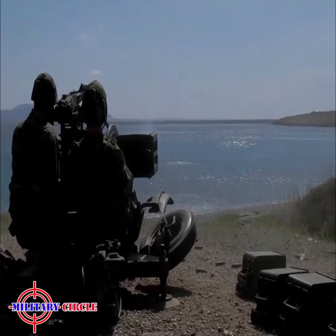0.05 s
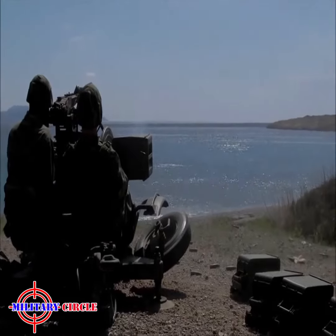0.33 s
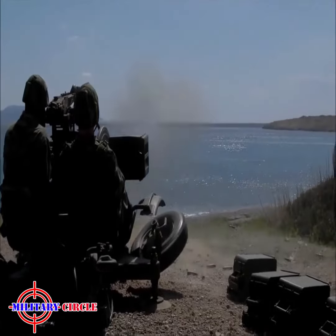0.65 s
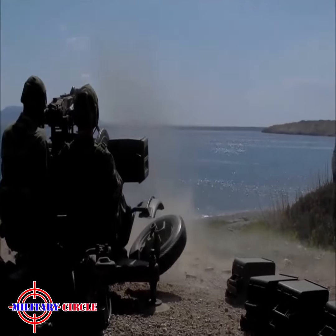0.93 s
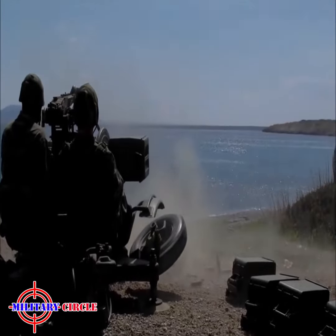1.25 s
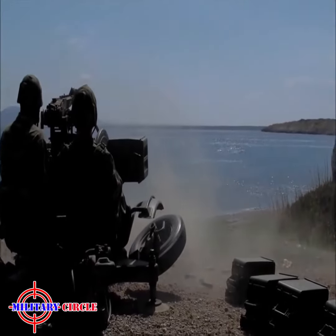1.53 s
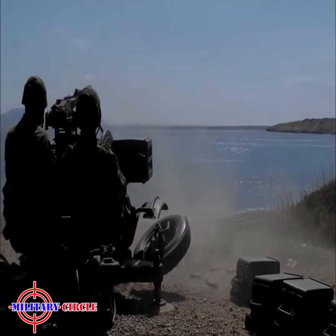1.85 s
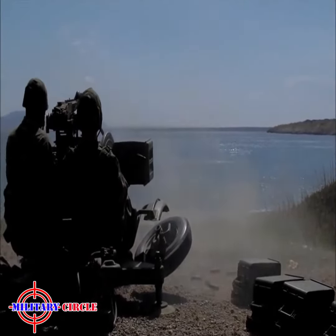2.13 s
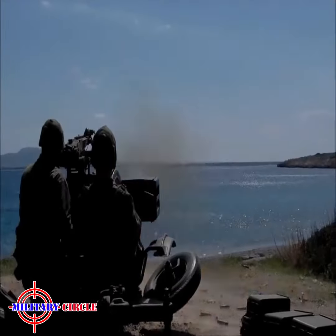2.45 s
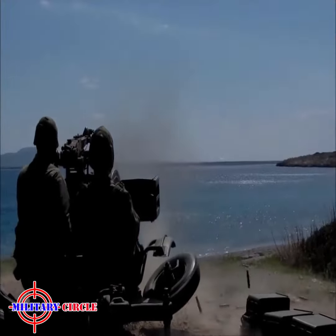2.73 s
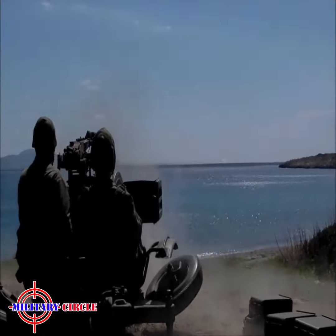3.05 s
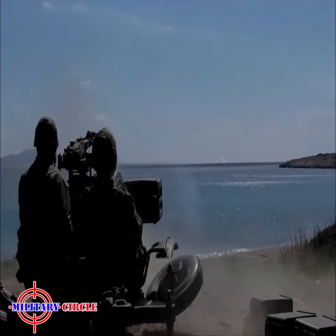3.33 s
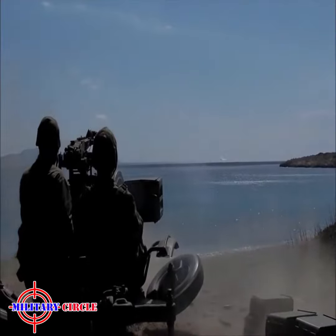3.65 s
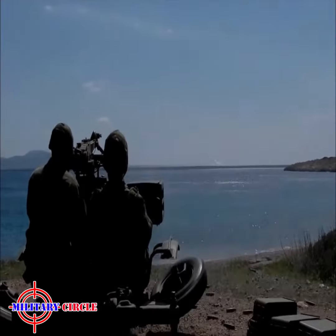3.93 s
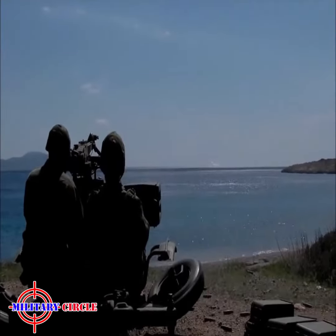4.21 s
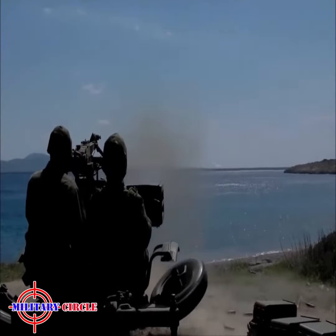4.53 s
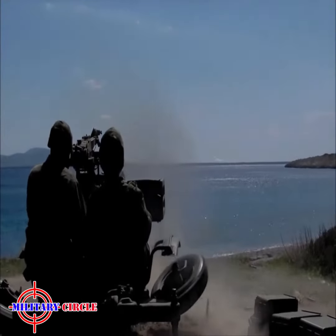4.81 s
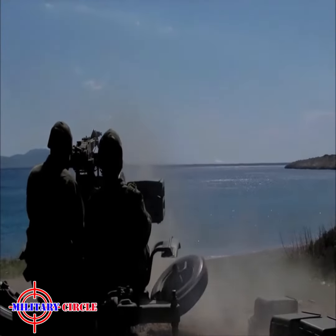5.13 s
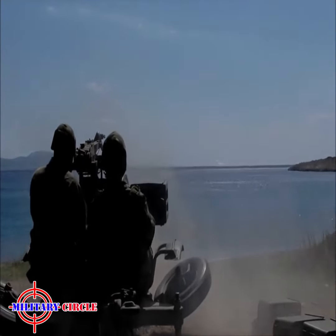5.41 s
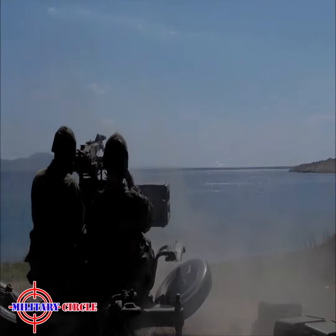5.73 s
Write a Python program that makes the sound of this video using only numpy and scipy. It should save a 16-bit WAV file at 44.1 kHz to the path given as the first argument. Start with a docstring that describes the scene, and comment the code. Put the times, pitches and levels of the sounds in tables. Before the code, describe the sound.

Wind buffets the microphone as a nearby anti-aircraft gun fires three rapid bursts, each trailed by rumbling echoes and clinking shell cases.

```python
"""Gusts on a shore buffet the microphone, mostly its right port, among a few dry ticks.
At 0.5 s a twin-barrel anti-aircraft cannon a few metres away fires five rounds. Each blast overloads
the limiter, so its boom only comes through between rounds. The land rolls the burst back, ever deeper,
while spent cases and links spill on the stones. Louder bursts follow at 2.4 s and 4.3 s, each trailed
by jingling brass; a low rumble lingers under the wind to the end."""
import sys
import numpy as np
from scipy import signal
from scipy.fft import rfft, irfft
from scipy.io import wavfile

SR = 44100
rng = np.random.default_rng(int(sys.argv[2]) if len(sys.argv) > 2 else 0)


def to_wav(s):
    """Save 16-bit WAV."""
    ch = np.atleast_2d(s).T  # columns
    pcm = np.round(np.clip(ch, -1, 1) * 32767)  # PCM
    wavfile.write(sys.argv[1], SR, pcm.astype(np.int16))


N = 258867
T = np.arange(N) / SR
HZ = np.maximum(np.fft.rfftfreq(N, 1 / SR), 1)


def undb(db):
    """Decibels to gain."""
    return 10 ** (np.asarray(db) / 20)


def unit(x):
    """Scale to rms 1."""
    return x / np.sqrt(np.mean(x ** 2))


def over_hz(points):
    """Join (Hz, value) points on a log-frequency axis."""
    hz, value = np.transpose(points)
    return np.interp(np.log(HZ), np.log(hz), value)


def resonance(hz, q):
    """Complex band-pass response, 1 at the centre."""
    return 1 / (1 + 1j * q * (HZ / hz - hz / HZ))


def smooth(x, tau_s):
    """One-pole average."""
    pole = np.exp(-1 / (tau_s * SR))
    return signal.lfilter([1 - pole], [1, -pole], x)


def white():
    """Two independent white noises."""
    return rng.standard_normal((2, N))


def drift(rate_hz):
    """Smooth random motion up to about rate_hz; rms 1."""
    return unit(irfft(rfft(rng.standard_normal(N)) / (1 + (HZ / rate_hz) ** 4), N))


def strike(start_s, rise_s, t60_s, hold_s=0):
    """Envelope: linear rise, hold, exponential decay."""
    age = np.maximum(T - start_s, 0)
    return np.minimum(age / rise_s, 1) * np.exp(-np.log(1000) * np.clip((age - hold_s) / t60_s, 0, 2))


def swell(peak_s, sigma_s):
    """Gaussian envelope."""
    return np.exp(-((T - peak_s) / sigma_s) ** 2 / 2)


def power_sum(envelopes):
    """Joint envelope of uncorrelated sounds."""
    return np.sqrt(sum(envelope ** 2 for envelope in envelopes))


def n_wave(start_s, width_s):
    """Rounded push-pull pressure pulse, peak 1."""
    age = np.clip((T - start_s) / width_s - 2, -6, 6)
    return np.sqrt(2 * np.e) * age * np.exp(-age ** 2)


def throb(hz, q, side_gain=0.053):
    """Pressure swings of uneven length and nearly even size, alike on both sides."""
    bins = N // 32
    band = np.fft.ifft(rfft(white())[:, :bins] * resonance(hz, q)[:bins] ** 2)
    swing = np.real(band / (np.abs(band) + np.std(band) / 2))
    mid, side = irfft(rfft(swing), N)
    return unit(np.array([mid + side_gain * side, mid - side_gain * side]))


# left-right likeness of scene sound and of wind on the ports: (frequency [Hz], in-phase weight)
FIELD_LIKENESS = [(60, 0.86), (280, 0.85), (640, -0.19), (1400, -0.36), (3100, -0.64), (15000, -0.41)]
WIND_LIKENESS = [(60, 0.27), (130, 0.31), (300, -0.099), (640, -0.19), (1400, -0.62), (3100, -1.21),
                 (9000, 0.25)]
# lag of the left port: (frequency [Hz], quarter-cycle weight)
PORT_LAG = [(100, 0.033), (280, 0.13), (600, 0.6), (1400, 0.55), (3000, 0.014)]


def stereo(noises, response, likeness=FIELD_LIKENESS):
    """Colour two independent noises, mix them as mid and side and shift the left's phase; rms 1."""
    shared = over_hz(likeness) - 1j * over_hz(PORT_LAG)
    coherence = np.minimum(np.abs(shared), .98)
    mid, side = rfft(noises) * response * np.sqrt([1 + coherence, 1 - coherence])
    left = (mid + side) * np.exp(1j * np.angle(shared))
    return unit(irfft(np.array([left, mid - side]), N))


# level of the wind noise, dropping out abruptly near 2.24 s: (time [s], level [dB])
WIND_LEVEL = [(0, -15.5), (.14, -16), (.39, -15.5), (.9, -17), (1.07, -14.5), (1.22, -18), (1.41, -16.5),
              (1.44, -22.5), (1.51, -18.5), (1.72, -15), (1.9, -23), (2.01, -16), (2.23, -18), (2.25, -28),
              (2.36, -15.5), (2.9, -18), (3.14, -25), (3.35, -20), (3.45, -24), (3.53, -18), (3.68, -18),
              (3.75, -21.5), (3.79, -18), (3.95, -19), (4.06, -16.5), (4.24, -20.5), (4.26, -16),
              (4.8, -18.5), (5.11, -18.5), (5.14, -17.5), (5.33, -15), (5.53, -16.5), (5.62, -14),
              (5.86, -17)]


def wind_db(usual_db=-16.5):
    """Level of the wind noise relative to its usual value."""
    return np.interp(T, *np.transpose(WIND_LEVEL)) - usual_db


# spectra of wind on the ports: (frequency [Hz], level [dB])
BUFFET_SPECTRUM = [(20, -41), (35, -11), (70, -3.5), (150, 0), (380, -1), (600, -9), (900, -13.5),
                   (1500, -36), (4000, -61)]
FLUTTER_SPECTRUM = [(200, -44), (500, 9.5), (850, 6), (1500, 0.5), (2250, -7), (3600, -18.5), (5000, -50),
                    (9000, -42.5), (15000, -75)]


def wind(buffet_db=-16, flutter_db=-21, left_buffet_db=-10.5, left_flutter_db=-6, flutter_slope=2.39):
    """Eddies thump the ports and break up into a quick, spitting flutter."""
    eddies = drift(34)
    sputter_db = 3 * eddies + 2.5 * drift(110)
    thumps = white() * undb(0.96 * eddies + 4.15 * drift(490))
    spits = white() * undb(sputter_db + 3.5 * drift(410))
    buffet = stereo(thumps, undb(over_hz(BUFFET_SPECTRUM)), WIND_LIKENESS)
    flutter = stereo(spits, undb(over_hz(FLUTTER_SPECTRUM)), WIND_LIKENESS)
    buffet *= undb(buffet_db + wind_db()) * undb([[left_buffet_db], [0]])
    flutter *= undb(flutter_db + flutter_slope * wind_db()) * undb([[left_flutter_db], [0]])
    return buffet + flutter


def wind_crackle(db=-27, rate_hz=110, gust_slope=3.4, scatter_db=4, centre_hz=700, left_db=-8):
    """Small eddies burst on the right port as dull pressure spikes, harder in gusts."""
    spikes = (rng.random(N) < rate_hz / SR) * undb(scatter_db * np.clip(rng.standard_normal(N), -2, 2))
    dull = resonance(centre_hz, .4) ** 3 / (1 + (HZ / 1900) ** 5)
    pops = unit(irfft(rfft(spikes) * dull, N))
    return pops * undb(db + gust_slope * wind_db()) * np.array([[-undb(left_db)], [1]])


# hardest eddies: (time [s], level [dB])
SLAPS = [(.294, -13), (0.401, -3), (0.458, -1), (1.083, -11), (1.141, -20), (1.394, -3), (1.732, -14),
         (1.822, -5.5), (2.037, -4), (2.168, -4.5), (2.223, 0), (3.236, -13.5), (3.521, -10), (3.57, -17),
         (3.636, -14), (3.678, -5.5), (3.709, -6.5), (3.787, -6), (3.816, -9), (3.881, -9), (4.029, -13),
         (4.193, -7), (4.259, -1), (5.152, 5), (5.175, -3), (5.224, -16), (5.295, -3), (5.309, -2),
         (5.448, -1), (5.57, -12), (5.607, 0), (5.661, -6), (5.692, 0), (5.838, -6)]


def wind_slaps(pulse_db=-1, flutter_db=-7, thump_db=-13, left_db=-8):
    """A lone eddy hits the right port: pulse, flutter, thump; the left port swings the other way."""
    pulses = sum(undb(db + pulse_db) * n_wave(s, 0.0004) for s, db in SLAPS)
    flutter_env = sum(undb(db + flutter_db) * strike(s, 0.0019, 0.035) for s, db in SLAPS)
    flutter = flutter_env * stereo(white(), resonance(650, .6) ** 3, WIND_LIKENESS)
    thump_env = sum(undb(db + thump_db) * strike(s, 0.005, 0.092) for s, db in SLAPS)
    thump = thump_env * stereo(white(), resonance(340, 1) ** 2, WIND_LIKENESS)
    return (pulses * np.array([[-1], [1]]) + flutter + thump) * undb([[left_db], [0]])


# dry ticks and one sharp click: (time [s], level [dB], left minus right [dB], t60 [s])
TICKS = [(0.024, -20, -4, .019), (.035, -27, 0, 0.016), (0.2944, -19, -4, .022), (0.345, -27, -4, 0.021),
         (0.394, -22.5, -4, 0.042), (0.456, -23, -5, 0.037), (0.479, -21, -1, 0.034),
         (0.9972, -13.5, -5, 0.015), (1.058, -25, -7, 0.05), (1.084, -26, 1, .03),
         (1.1345, -23.5, -7, 0.018), (1.636, -26.5, -3, .019), (1.685, -28, 4, 0.021),
         (2.046, -31, -7, .019), (2.222, -24, -3, 0.019), (3.9648, -18, 9, 0.0053), (4.123, -33, -9, 0.013),
         (5.4485, -29, 4, .019)]
# tick spectrum: (frequency [Hz], level [dB])
TICK_SPECTRUM = [(500, -5), (2000, 12.5), (7000, -8.5), (15000, -17)]


def ticks(rattle_db=-17):
    """Dry ticks and one sharp click, each trailing a fine rattle five times its length."""
    envelope = 0
    for s, db, pan_db, t60_s in TICKS:
        shape = strike(s, 0.0012, t60_s) + undb(rattle_db) * strike(s, 0.01, 5 * t60_s)
        envelope += undb(db + np.array([[pan_db], [-pan_db]]) / 2) * shape
    return envelope * stereo(white(), undb(over_hz(TICK_SPECTRUM)))


# modes of a brass case: (frequency [Hz], level [dB], t60 [s])
BRASS_MODES = [(2050, 1, 0.048), (3090, 4, 0.058), (3500, -6, .05), (4290, 1, 0.14), (5230, -8, .06),
               (6700, -31, 0.091), (9950, -10.5, 0.13), (10400, -15, .11), (11700, -20, .07),
               (13000, -20, .03)]


def case_ring(pitch, tilt_db_per_oct=0, split=.018):
    """One knock on a case; dents split each mode into a cluster of three."""
    t = T[:SR // 4]
    out = 0
    for hz, db, t60_s in BRASS_MODES:
        cluster_hz = hz * pitch * (1 + split * rng.uniform(-1, 1, (3, 1, 1)))
        swing = np.sin(2 * np.pi * (cluster_hz * t + rng.random((3, 2, 1)))).sum(axis=0)
        gain = undb(db + tilt_db_per_oct * np.log2(hz / BRASS_MODES[0][0]))
        out += gain * np.exp(-np.log(1000) * t / t60_s) * swing
    return out


# cases rolling together: (peak time [s], level [dB], sigma [s])
JINGLES = [(3.22, -48.5, .16), (5.15, -44, .17)]


def jingle(knock_rate_hz=22, count=7, detune=.012):
    """Rolling cases knock together and ring at nearly one pitch."""
    rings = 0
    for pitch in 1 + detune * np.linspace(-1, 1, count):
        knocks = (rng.random(N) < knock_rate_hz / SR) * rng.uniform(0.29, 1, (2, N))
        rings += signal.oaconvolve(knocks, case_ring(pitch), axes=1)[:, :N]
    return unit(rings) * sum(undb(db) * swell(s, sigma_s) for s, db, sigma_s in JINGLES)


# spill of brass per burst: (landing time [s], level [dB], fade [dB/s])
SPILLS = [(.88, -32.5, 22), (2.78, -26.5, 36), (4.97, -28, 34)]
# scuffed gravel: (frequency [Hz], level [dB])
GRIT_SPECTRUM = [(1000, 0.5), (3800, 3), (5500, -12), (7500, -48), (9000, -12.5), (10500, -12),
                 (15000, -28)]


def grit(gain_db=-2, stir_db=-46.5, gust_slope=2.9, settle_db_per_s2=8):
    """Cases and links scuff the gravel during each burst, then settle; wind always stirs a little."""
    envelopes = [undb(stir_db + gust_slope * wind_db())]
    for (start_s, *_), (landing_s, db, fade) in zip(BURSTS, SPILLS):
        age = np.maximum(T - landing_s, 0)
        envelopes.append((T > start_s) * undb(db - fade * age - settle_db_per_s2 * age ** 2))
    scuffing = undb(1.8 * drift(45) + 1.2 * drift(600)) * white()
    return undb(gain_db) * power_sum(envelopes) * stereo(scuffing, undb(over_hz(GRIT_SPECTRUM)))


# single cases landing: (time [s], level [dB], pitch [ratio], tilt [dB/octave])
CLINKS = [(1.908, -57, 1, 9), (3.083, -61, 0.9, 0), (3.169, -58, 0.82, 0), (3.24, -58, 0.93, 5),
          (3.32, -52, 1, 9), (3.469, -52, 0.96, 3), (4.97, -47, 1.01, -8), (5.06, -49, 0.95, -10),
          (5.197, -45.5, 1.08, 1), (5.279, -51, 0.96, 4)]


def clinks(chatter_s=0.037, scuff_db=-1):
    """A case chatters on a stone, scuffs the grit and rings out."""
    out, size = np.zeros((2, N)), SR // 5
    for s, db, pitch, tilt in CLINKS:
        chatter = rng.standard_normal((1, size)) * np.exp(-T[:size] / chatter_s)
        clink = signal.fftconvolve(chatter, case_ring(pitch, tilt))
        start = int(s * SR)
        out[:, start:start + clink.shape[1]] += undb(db) * clink / np.std(clink[:, :size // 4])
    scuff_env = sum(undb(db + scuff_db) * strike(s, .003, 0.22) for s, db, *_ in CLINKS)
    return out + scuff_env * stereo(white(), undb(over_hz(GRIT_SPECTRUM)))


# far echo per burst: (first return [s], level [dB], centre [Hz], fade [dB/return], rumble [dB])
ROLLS = [(.885, -15, 144, 11.5, -41), (2.755, -15, 141, 9, -32), (4.775, -16.5, 160, 2, -27)]


def rolls(gain_db=-2, gap_s=0.13, sigma_s=0.055, pitch_step=0.677, fire_hz=14.7):
    """The land returns each burst three times, ever deeper, still beating at the rate of fire."""
    out = 0
    for s, db, hz, fade_db, _ in ROLLS:
        for k in range(3):
            envelope = undb(db + gain_db - fade_db * k) * swell(s + k * gap_s, sigma_s)
            out += envelope * throb(hz * pitch_step ** k, q=0.82)
    return out * (1 + 0.64 * np.sin(2 * np.pi * fire_hz * T))


def rumble(delay_s=0.13, rise_s=0.052, t60_s=5.5, centre_hz=75):
    """The deepest part of the reports lingers over the bay."""
    gains = np.repeat([undb(db) for *_, db in ROLLS], len(ROUNDS) // len(ROLLS))
    tails = (gain * strike(s + delay_s, rise_s, t60_s) for (s, *_), gain in zip(ROUNDS, gains))
    return power_sum(tails) * stereo(white(), resonance(centre_hz, 0.53) ** 2)


# spectrum scattered by the land: (frequency [Hz], level [dB])
SCATTER_SPECTRUM = [(30, -22), (100, -7), (300, -34), (700, 5.5), (1500, 6), (2300, 3), (4000, -10.5),
                    (6000, -14.5), (15000, -71)]


def land_scatter(db=-22, rise_s=0.21, t60_s=1.565):
    """Slopes and shore scatter every round into a patchy tail."""
    envelope = undb(db) * power_sum(strike(s, rise_s, t60_s) for s, *_ in ROUNDS)
    patchy = undb(1.2 * drift(50) + 1.8 * drift(420)) * white()
    return envelope * stereo(patchy, undb(over_hz(SCATTER_SPECTRUM)))


def reflections(x, spread_s=0.018, count=12, gain=.11):
    """Mount, crew and ammunition boxes throw back the treble, giving every round one hard colour."""
    lags_s = rng.uniform(0.092, 1, count) * spread_s
    copies = sum(np.exp(-2j * np.pi * HZ * lag) for lag in lags_s)
    return irfft(rfft(x) * (1 + gain * copies * HZ / (HZ + 2000)), N)


def booms(gain_db=-0.5, delay_s=0.033, rise_s=.008, t60_s=0.18, hold_s=0.0048):
    """A low, slightly wavering boom swells behind each crack."""
    out = sum(undb(db + gain_db) * strike(s + delay_s, rise_s, t60_s, hold_s) * throb(hz, q=1.23)
              for s, *_, db, hz in ROUNDS)
    return out * undb(.6 * drift(40))


# start of each burst: (time [s], slam [dB], hiss just before it [dB])
BURSTS = [(0.5083, -6, -30), (2.3795, 6, -19), (4.3305, 6, -16)]


def shocks(front_db=2, width_s=0.00029, ground_lag_s=0.00188, ground_db=-1):
    """A burst opens with a slam: shock front, ground bounce, short bark."""
    fronts = bark_env = 0
    for s, db, _ in BURSTS:
        bounce = undb(ground_db) * n_wave(s + ground_lag_s, width_s)
        fronts += undb(db + front_db) * (n_wave(s, width_s) + bounce)
        bark_env += undb(db) * strike(s, 0.0002, .052)
    return fronts + bark_env * stereo(white(), resonance(970, 0.22) ** 2)


def hiss_envelope(length_s=.068, tau_s=.026):
    """A brief hiss swells just before each burst."""
    return sum(undb(db) * np.exp(-np.abs(T - s) / tau_s) * (T < s) * (T > s - length_s)
               for s, _, db in BURSTS)


# rounds, quickening within a burst: (time [s], roar [dB], crack [dB], boom [dB], boom pitch [Hz])
ROUNDS = [(0.5072, -2, -9.5, -5.5, 212), (0.579, 5.5, 0, -4.5, 245), (0.649, 1, -5, -7, 272),
          (0.712, 3.5, -3.5, -2.5, 277), (0.782, -0.5, -0.5, -6, 240), (2.3773, 7, 2, -1, 254),
          (2.451, 2.5, -3.5, -3, 272), (2.519, 0.5, -3, -3.5, 258), (2.582, -1.5, -1.5, -8.5, 272),
          (2.647, -.5, -3, -4, 204), (4.331, 8, 3.5, 2.5, 300), (4.401, 4.5, -2, -4, 252),
          (4.466, 1.5, -2.5, -3.5, 252), (4.534, 0, -5, -13, 222), (4.596, -4, -7, -4.5, 215)]
# blast spectrum: (frequency [Hz], level [dB])
BLAST_SPECTRUM = [(30, -7), (100, 5), (300, -1.5), (700, 9.5), (1300, 8), (2200, 10), (3500, 8), (5500, 4),
                  (9000, 3.5), (12500, 0.5), (15500, -5)]


def blasts(split_hz=5200):
    """Each round is a rattling roar of muzzle gas under a shorter, bright crack."""
    roar = power_sum(undb(db) * strike(s, 0.0065, t60_s=0.29, hold_s=0.0047) for s, db, *_ in ROUNDS)
    crack = power_sum(undb(db) * strike(s, .01, t60_s=.16, hold_s=.022) for s, _, db, *_ in ROUNDS)
    turbulence_db = -0.4 * drift(130) + 0.3 * drift(1400) + 2 * drift(2260)
    noise = stereo(white() * undb(turbulence_db), undb(over_hz(BLAST_SPECTRUM)))
    body = irfft(rfft(noise) / (1 + (HZ / split_hz) ** 3), N)
    treble = noise - body
    return (roar + hiss_envelope()) * body + crack * treble


def scene():
    """Gun, land, wind, brass and ticks."""
    gun = reflections(blasts()) + shocks() + booms()
    land = land_scatter() + rolls() + rumble()
    air = wind() + wind_slaps() + wind_crackle()
    brass = jingle() + grit() + clinks()
    return gun + land + air + brass + ticks()


def limiter(x, threshold_db=-11.5, window_s=.003, lead_s=.0015, slew_s=.0016):
    """Soft-knee gain reduction, both channels linked; a big slam outruns it."""
    power = np.interp(T + lead_s, T, smooth(np.mean(x ** 2, axis=0), window_s))
    gain = (1 + (power / undb(threshold_db) ** 2) ** 2) ** (-1 / 4)
    return x * (1 - smooth(1 - gain, slew_s))


# two narrow dips in the treble: (centre [Hz], width [Hz])
TREBLE_NOTCHES = [(2880, 650), (5000, 150)]


def record(dry):
    """Treble notches, limiter, rounded peaks and a steep cut above 15.5 kHz."""
    for hz, width_hz in TREBLE_NOTCHES:
        dry = signal.lfilter(*signal.iirnotch(hz, hz / width_hz, fs=SR), dry)
    rounded = .88 * np.tanh(limiter(dry) / .88)
    return signal.sosfilt(signal.ellip(10, .2, 80, 15500, fs=SR, output="sos"), rounded)


dry = scene()
out = record(dry)
to_wav(out)
```